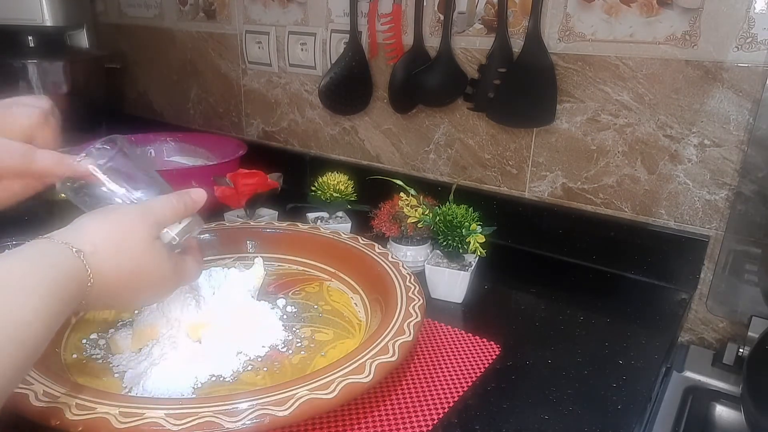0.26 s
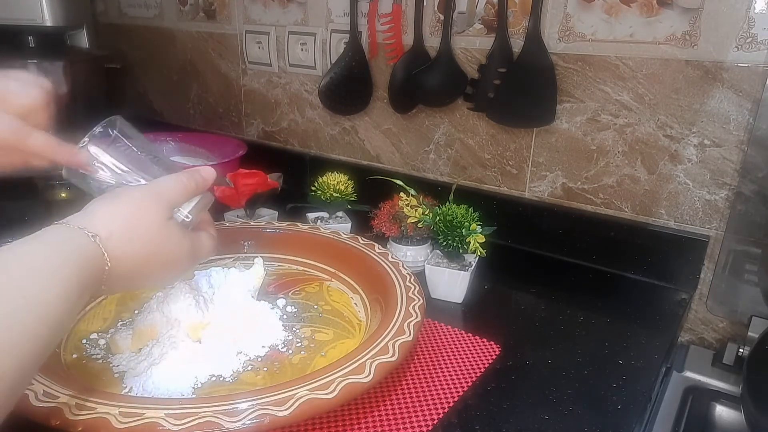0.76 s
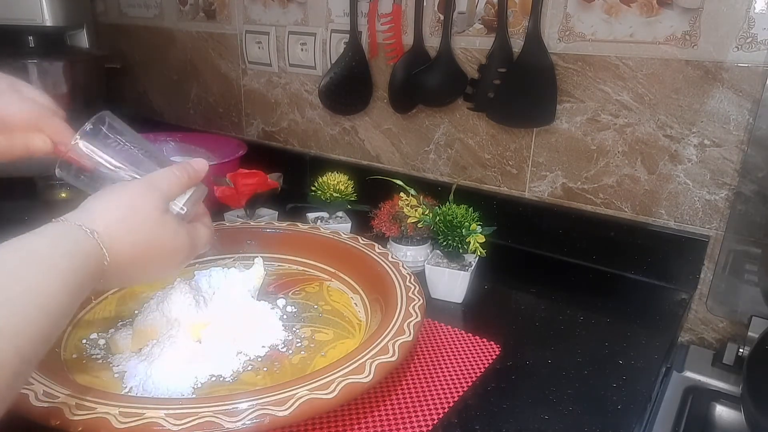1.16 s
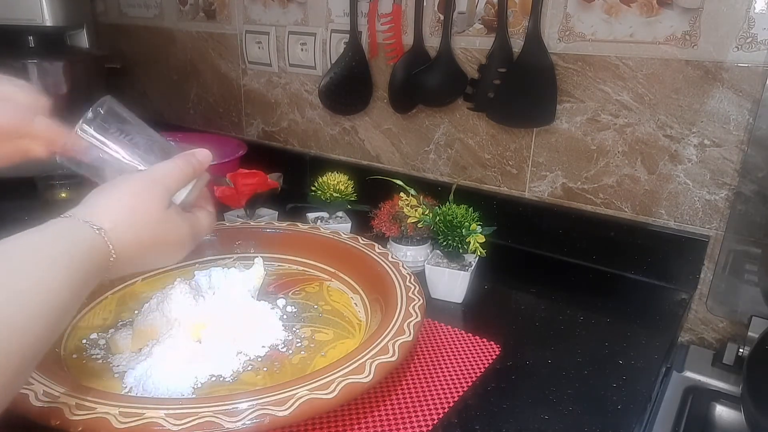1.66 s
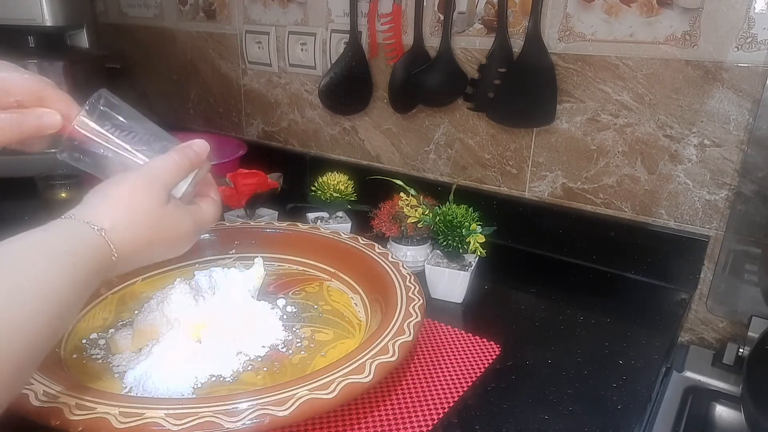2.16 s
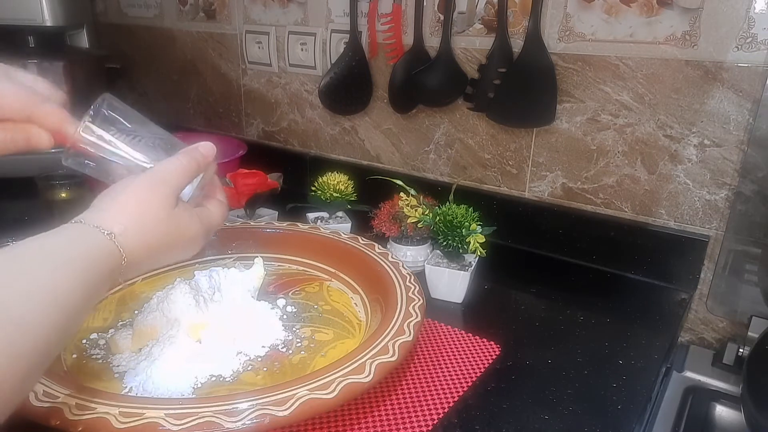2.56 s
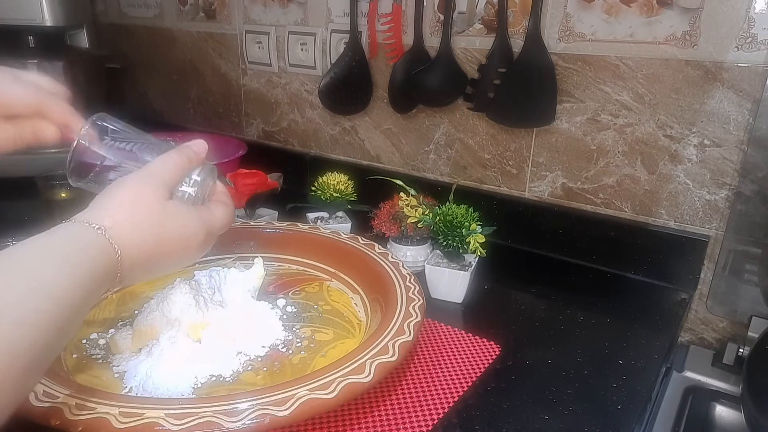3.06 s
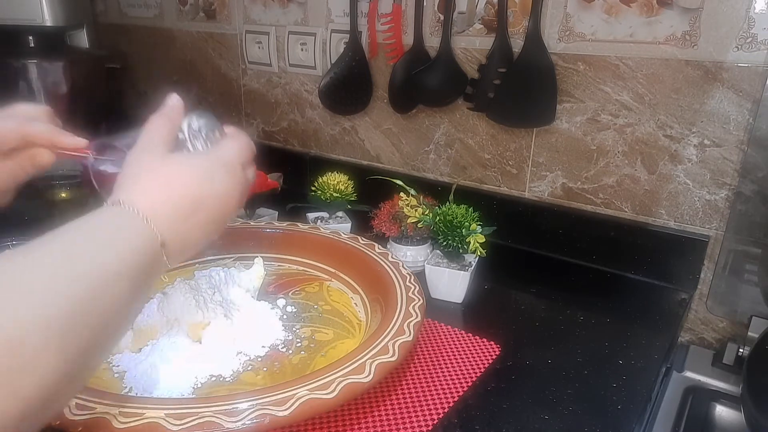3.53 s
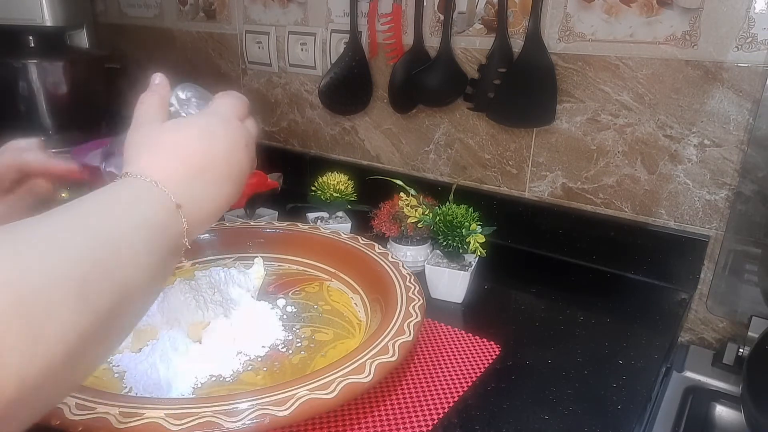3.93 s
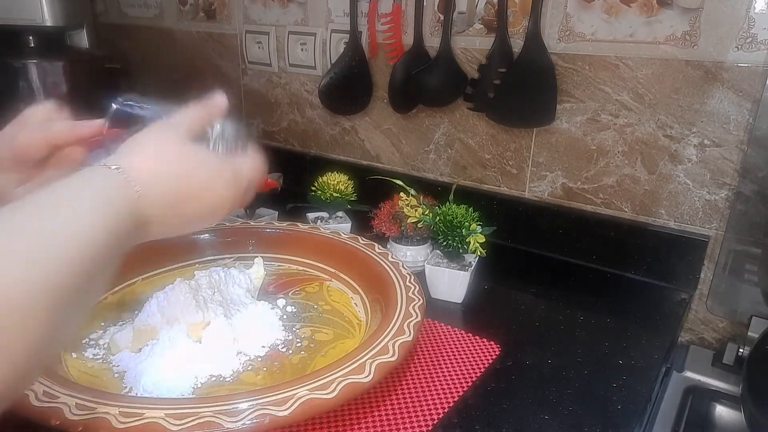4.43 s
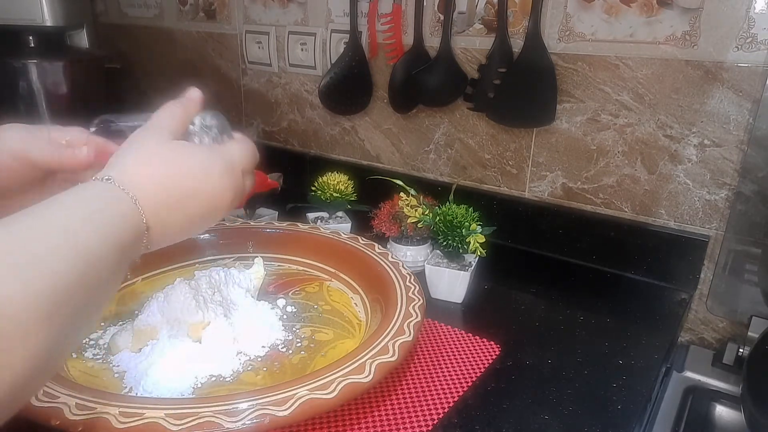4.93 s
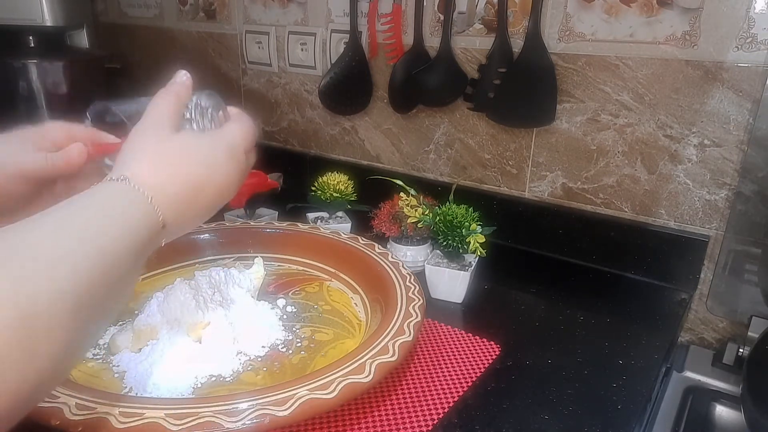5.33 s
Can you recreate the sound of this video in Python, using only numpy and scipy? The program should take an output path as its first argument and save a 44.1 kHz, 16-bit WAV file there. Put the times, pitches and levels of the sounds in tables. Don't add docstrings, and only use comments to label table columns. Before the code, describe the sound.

Someone scrapes out a glass with a spoon: sharp bright clinks, hollow taps on the bottom, two tiny squeaks, then soft scraping.

```python
import sys
import numpy as np
from scipy import signal
from scipy.fft import rfft, irfft, next_fast_len
from scipy.io import wavfile

SR = 44100
rng = np.random.default_rng(int(sys.argv[2]) if len(sys.argv) > 2 else 0)


def wrap_up_sound(samples):
    columns = np.atleast_2d(samples).T
    tamed = np.clip(columns, -1, 1)
    steps = np.round(tamed * 32767).astype(np.int16)
    wavfile.write(sys.argv[1], SR, steps)


def boost(x):
    u = np.asarray(x, float) / 20
    return 10 ** u


N = 246519

# (time [s], level [dB], air column pitch [Hz], thud level [dB])
BOTTOM_KNOCKS = [(0.001, -34, 875, -37.5), (0.029, -34.5, 940, -61.5), (0.246, -49, 910, -51),
                 (0.333, -49, 870, -75.5), (0.596, -19, 915, -50.5), (0.643, -33, 874, -35),
                 (0.936, -41, 855, -71), (1.055, -52, 960, -55), (1.306, -22, 888, -41),
                 (1.596, -22.5, 857, -32.5), (1.661, -37, 717, -37.5), (1.843, -21.5, 885, -37),
                 (2.07, -19.5, 878, -36), (2.157, -32.5, 872, -53), (2.196, -27.5, 885, -37),
                 (2.442, -16, 871, -34.5), (2.474, -39, 930, -41), (2.826, -34.5, 868, -54),
                 (2.91, -54, 840, -82), (3.165, -24.5, 882, -36), (3.228, -32, 935, -51),
                 (3.268, -33.5, 780, -34.5), (3.457, -43, 840, -53.5), (3.682, -31, 783, -47),
                 (3.74, -41, 985, -36), (4.034, -13.5, 873, -29), (4.522, -25.5, 890, -44),
                 (4.564, -46, 960, -54), (4.607, -37.5, 900, -85)]


def at_hz(points, hz):
    p = np.array(points)
    return np.interp(np.log(np.maximum(hz, 1)), np.log(p[:, 0]), p[:, 1])


def rms_one(x):
    return x / np.sqrt(np.mean(x ** 2) + 1e-20)


def noise(channels=None):
    return rng.standard_normal(N if channels is None else (channels, N))


def band_noise(low_hz, high_hz, order=2, channels=None):
    band = signal.butter(order, [low_hz, high_hz], "band", fs=SR, output="sos")
    return signal.sosfilt(band, noise(channels))


def coloured(spectrum, channels=1):
    size = next_fast_len(N)
    hz = np.arange(size // 2 + 1) * SR / size
    white = rfft(rng.standard_normal((channels, size)))
    return rms_one(irfft(white * boost(at_hz(spectrum, hz)), size)[:, :N])


def train(times, heights):
    clicks = np.full(N, 1e-18)
    at = np.round(np.asarray(times) * SR).astype(int)
    np.add.at(clicks, np.clip(at, 0, N - 1), heights)
    return clicks


def ring(clicks, hz, t60):
    r, w = boost(-60 / (t60 * SR)), 2 * np.pi * hz / SR
    return signal.lfilter([0, np.sin(w)], [1, -2 * r * np.cos(w), r * r], clicks)


def fade(clicks, t60):
    return signal.lfilter([1], [1, -boost(-60 / (t60 * SR))], clicks)


def dying(db, hz, t60, t, phase=0):
    return boost(db) * np.exp(-np.log(1000) * t / t60) * np.sin(2 * np.pi * hz * t + phase)


def flutter(hz, depth_db):
    slow = signal.sosfilt(signal.butter(2, hz, fs=SR, output="sos"), noise())
    return boost(depth_db * rms_one(slow))


def background():
    # (frequency [Hz], level [dB per Hz])
    air_colour = [(20, -29.5), (33, -19), (45, -12), (70, -11), (120, -15), (200, -17.5), (330, -16),
                  (600, -17), (1000, -28), (2200, -35.5), (8000, -38), (16000, -35)]
    # (frequency [Hz], level [dB rms])
    hum_lines = [(49, -92), (97, -81), (147, -80.5), (1668, -82)]
    # (time [s], level [dB])
    jolts = [
        (0.0, -53),
        (0.519, -67),
        (0.839, -50),
        (2.12, -59),
        (2.398, -55),
        (2.579, -58),
        (3.949, -71),
        (4.059, -60),
        (4.499, -66),
    ]
    t = np.arange(N) / SR
    mid, side = coloured(air_colour, channels=2)
    air = boost(-72.5) * (mid + 0.36 * side * np.c_[[1, -1]])
    hum = sum(boost(db + 2) * np.sin(2 * np.pi * hz * t) * flutter(6, 4.8) for hz, db in hum_lines)

    low = band_noise(260, 420, channels=2)
    low = low[0] + 0.5 * low[1] * np.c_[[1, -1]]
    knocked = np.array(BOTTOM_KNOCKS)
    swell = train(knocked[:, 0], boost(-51 + 0.46 * knocked[:, 1]))
    regrip_s, regrip_length_s, regrip_db = 4.47, 0.062, -56
    regrip = boost(regrip_db) * np.exp(-((t - regrip_s) / regrip_length_s) ** 2)
    hands = boost(-73.5) + fade(swell, 0.26) - fade(swell, 0.06) + regrip
    rumble = hands * rms_one(low) * flutter(13, 4.8)

    s, db = np.transpose(jolts)
    jolt = ring(train(s, boost(db)), hz=95, t60=0.081) + ring(train(s, boost(db - 6.5)), hz=60, t60=0.096)
    return air + rumble + (hum + jolt) * np.c_[[0.45, 1.1]]


def kitchen(x):
    # (frequency [Hz], time to fall 60 dB [s])
    room_t60 = [(300, 1), (1000, 0.33), (3000, 0.34), (8000, 0.34), (15000, 0.29)]
    t, tail = np.arange(int(0.7 * SR)) / SR, 0
    for low in 60 * 2.0 ** np.arange(8):
        high = min(2 * low, 15000) if low < 7000 else 18000
        band = signal.butter(2, [low, high], "band", fs=SR, output="sos")
        mid, side = signal.sosfilt(band, rng.standard_normal((2, len(t))))
        spread = np.clip(low / 500, 0.6, 1)
        both = mid + spread * side * np.c_[[1, -1]]
        tail = tail + both * boost(-60 * t / at_hz(room_t60, 2.06 * low))
    tail = tail * np.clip((t - 0.002) / 0.00067, 0, 1)
    tail = tail / np.sqrt(np.sum(tail ** 2) / 2)
    return signal.fftconvolve(x[None], tail, axes=1)[:, :N]


def motions():
    # (time [s], length [s], air column level [dB], its pitch [Hz], rustle level [dB])
    strokes = [
        (.29, 0.18, -54.5, 882, -56.5),
        (.97, 0.12, -66, 870, -52),
        (2.89, 0.17, -62, 888, -59.5),
        (4.386, 0.059, -51.5, 1070, -51.5),
        (5.042, 0.068, -82, 727, -58.5),
        (5.226, .16, -62, 860, -53),
    ]
    # (time [s], air column level [dB], its pitch [Hz])
    long_drag = [
        (4.6, -61, 870),
        (4.72, -59, 818),
        (4.83, -56.5, 880),
        (4.982, -53.5, 835.5),
        (5.07, -61.5, 767),
        (5.1, -56.5, 734),
        (5.21, -63, 740),
    ]
    u = np.array([0, 0.4, 1])
    swell = 13.5 * np.array([-0.5, 0, -1])
    rise_hz = 61.4 * (u - 0.5)
    short = [np.c_[s + length * u, db + swell, hz + rise_hz, rustle_db + swell]
             for s, length, db, hz, rustle_db in strokes]
    long = np.array(long_drag)
    return short + [np.c_[long, long[:, 1] - 10]]


def drag():
    # (frequency [Hz], level [dB per Hz])
    rustle_colour = [(500, -6.5), (1100, -15), (1800, -13), (2500, -7.5), (3450, -8), (4200, -7),
                     (5700, -10), (6400, -8.5), (9700, -7), (12300, -9.5), (16000, -37.5)]
    out = np.zeros(N)
    rustle = coloured(rustle_colour)[0] * flutter(40, 3.07)
    rub = noise()
    for hz, db, t60 in [(2540, -6, 0.2), (3475, -8.5, 0.06), (6630, -18, 0.18)]:
        rustle = rustle + boost(db) * rms_one(ring(rub, hz, t60))
    i, q = rms_one(signal.sosfilt(signal.butter(1, 9, fs=SR, output="sos"), noise(2)))
    lively, dull = flutter(25, 1.9), signal.butter(2, 1300, fs=SR, output="sos")
    for rows in motions():
        s, column_db, hz, rustle_db = np.transpose(rows)
        n = np.arange(round(s[0] * SR), round(s[-1] * SR))
        t = n / SR
        on = np.clip(np.minimum(t - s[0], s[-1] - t) / 0.016, 0, 1)
        phase = 2 * np.pi * np.cumsum(np.interp(t, s, hz)) / SR
        whistle = (i[n] + 0.37) * np.cos(phase) + q[n] * np.sin(phase)
        column = signal.sosfilt(dull, whistle) * lively[n]
        column_gain = boost(np.interp(t, s, column_db) - 1)
        rustle_gain = boost(np.interp(t, s, rustle_db) - 3.5)
        out[n] += on * (column_gain * column + rustle_gain * rustle[n])
    return out


def squeaks():
    starts = [1.362, 2.524]
    # (length [s], start pitch [Hz], end pitch [Hz], grit level [dB])
    glides = [
        (0.024, 892, 954, -50.5),
        (0.034, 1080, 1123, -36.5),
    ]
    # (level of overtones 1, 2, 3, 4, 5 [dB])
    overtones = [
        (-25.5, -48, -49, -52, -57),
        (-40.5, -34.5, -30, -40, -51),
    ]
    out, rough = np.zeros(N), flutter(100, 2.9)
    grit = rms_one(band_noise(1500, 7000))
    for s, (length, start_hz, end_hz, grit_db), orders_db in zip(starts, glides, overtones):
        u = np.linspace(0, 1, round(length * SR))
        phase = 2 * np.pi * np.cumsum(start_hz + (end_hz - start_hz) * u) / SR
        tone = sum(boost(db) * np.sin((k + 1) * phase) for k, db in enumerate(orders_db))
        swell = np.sqrt(np.abs(np.sin(np.pi * u)))
        i = round(s * SR)
        out[i:i + len(u)] += (tone + boost(grit_db) * grit[i:i + len(u)]) * swell
    return out * rough


def knocks():
    out, t = np.zeros(N), np.arange(SR // 16) / SR
    onset = 1 - np.exp(-t / 0.0017)
    for s, db, hz, _ in BOTTOM_KNOCKS:
        tone = dying(0, hz, 0.034, t)
        for base_hz, base_db in [(1012, -17.5), (732, -16), (595, -18.5), (3540, -25)]:
            tone += dying(base_db, base_hz, 0.047, t)
        i = round(s * SR)
        out[i:i + len(t)] += boost(db + 2.25) * (tone * onset)[:N - i]
    rows = np.array(BOTTOM_KNOCKS)
    thud = rms_one(band_noise(450, 2600)) * fade(train(rows[:, 0], boost(rows[:, 3] + 3.5)), 0.019)
    return out + thud


def clinks():
    # (time [s], crack level [dB], lowest wall
    # mode [dB], second wall mode [dB], spoon [dB])
    loose = [
        (0.4923, -31, -17, -33, -32.5),
        (3.985, -34, -20.5, -26.5, -42.5),
        (4.0507, -23, -18.5, -20.5, -17),
        (4.916, -84, -79, -56, -71),
    ]
    held = [
        (0.0014, -26, -17.5, -27, -52.5),
        (0.6421, -33, -34.5, -43.5, -39),
        (1.225, -31, -25, -33, -28),
        (1.5946, -28, -39, -42, -33.5),
        (2.376, -25, -19.5, -31.5, -24.5),
        (3.099, -40, -34, -60, -36.5),
        (3.4555, -35, -45, -42, -38),
        (3.682, -31.5, -43.5, -43.5, -55.5),
        (3.966, -33, -26.5, -35, -31.5),
        (4.522, -32, -38, -51, -58),
    ]
    tight = [(0.157, -34, -25.5, -30.5, -35), (0.545, -30, -21, -38.5, -26.5),
             (0.8314, -27, -16.5, -26.5, -21), (1.093, -61, -47, -53, -65), (1.295, -41, -40, -46, -43),
             (1.547, -44, -32.5, -42, -39), (1.557, -34, -29, -39, -33.5), (1.662, -42.5, -29, -40.5, -51),
             (1.8175, -38.5, -31.5, -72, -40.5), (2.02, -28.5, -21, -35.5, -25.5),
             (2.198, -43.5, -38, -64.5, -69), (2.441, -26, -28.5, -36.5, -46.5),
             (2.4784, -24, -34, -38.5, -24), (2.7359, -34, -26.5, -38.5, -38.5),
             (3.269, -29.5, -24, -41, -31), (4.4307, -32, -28, -45.5, -38.5)]
    # (free ringing [s], lowest wall mode [Hz], level of its twin [dB])
    grips = [
        (.022, 2562, -11),
        (0.018, 2590, -2),
        (.0075, 2575, -11.5),
    ]
    # (frequency [Hz], level [dB], time to fall 60 dB [s])
    upper = [
        [(6310, -3.5, 0.16), (6200, -20, 0.019), (6155, -8.5, 0.058)],
        [(11900, -11, 0.071), (12400, -14.5, 0.024)],
        [(8603, 1.5, 0.041), (8480, -3.5, 0.043), (8730, -5, 0.021), (7500, -17, 0.052)],
        [(3904, 10.5, 0.043), (3810, -11.5, 0.04), (3150, -8, 0.022)],
        [(10620, 4, 0.094), (10400, -0.5, 0.081)],
        [(11150, 2.5, 0.1), (11260, 3.5, 0.1)],
    ]
    # (frequency [Hz], level [dB per Hz])
    crack_colour = [(400, -26.5), (800, -12), (1500, -14), (2200, -7), (3500, -6), (5000, -9),
                    (7000, -11.5), (8600, -5.5), (9600, -13.5), (11000, -12), (14000, -37), (16500, -52)]
    wall = np.array([(*row, *grip) for rows, grip in zip([loose, held, tight], grips) for row in rows])
    times, crack_db, first_db, second_db, spoon_db = wall.T[:5]

    turn_s, turn_loss_db = 2.65, 13.5
    tick_db = (crack_db + spoon_db) / 2 + 31 - 35.5 - turn_loss_db * (times > turn_s)
    spoon_4k_db = crack_db - 17.5
    spoon_10k_db = (second_db + spoon_db) / 2 - 10.5
    third_db = (first_db + second_db) / 2 + 0.46 * (second_db - spoon_db) - 23
    families = np.c_[second_db, tick_db, spoon_db, spoon_4k_db, spoon_10k_db, third_db]

    out, t = np.zeros(N), np.arange(SR // 6) / SR
    rise, slow_rise = 1 - np.exp(-t / 0.00009), 1 - np.exp(-t / 0.0015)
    twin_hz = -38.5
    chance = rng.standard_normal((len(wall), 60))
    for (s, _, ping_db, _, _, free, ping_hz, twin_db), levels, luck in zip(wall, families, chance):
        ping_hz *= 1 + 0.004 * luck[19]
        ping = dying(ping_db, ping_hz, 0.22, t)
        twin = dying(ping_db + twin_db, ping_hz + twin_hz, 0.067, t)
        sound = (ping + twin) * slow_rise
        modes = [(family_db, *mode) for family_db, family in zip(levels, upper) for mode in family]
        for k, (family_db, hz, mode_db, t60) in enumerate(modes):
            level_db = family_db + mode_db + 3.5 + 2 * luck[k]
            pitch_hz = hz * (1 + 0.0013 * luck[k + 20])
            sound += dying(level_db, pitch_hz, t60, t, 3 * luck[-1 - k]) * rise
        damped = boost(-60 * np.maximum(t - free, 0) / 0.018) + 0.13
        i = round(s * SR)
        out[i:i + len(t)] += (sound * damped)[:N - i]

    hits = train(times, boost(crack_db + 2))
    crack_shape = fade(hits, 0.027) - fade(hits, 0.0051) + boost(-5.5) * fade(hits, 0.035)
    crack = coloured(crack_colour)[0] * crack_shape
    tick = rms_one(band_noise(10500, 15000, order=4)) * fade(train(times, boost(tick_db - 7)), 0.14)
    return out + crack + tick


def left_way(x):
    # (frequency [Hz], level [dB], phase lead [radians])
    left_path = [(510.6, 2.5, .5), (950, -2.5, 0.42), (1600, 1, 0.47), (2700, 1, -.9), (4240, -2, 0.24),
                 (6300, -1, -0.14), (12000, -2.5, 0.31)]
    size, path = next_fast_len(N), np.array(left_path)
    hz = np.arange(size // 2 + 1) * SR / size
    gain, lead = boost(at_hz(path[:, :2], hz)), at_hz(path[:, ::2], hz)
    return irfft(rfft(x, size) * gain * np.exp(1j * lead), size)[:N]


def scene():
    glass = clinks() + knocks() + squeaks() + drag()
    no_bass = signal.butter(4, 480, "high", fs=SR, output="sos")
    glass = signal.sosfilt(no_bass, glass)
    left_lead, left_db = 6, -3.5
    direct = np.array([left_way(glass), np.r_[np.zeros(left_lead), glass[:-left_lead]]])
    mix = direct + boost(-3) * kitchen(glass) + background()
    return mix * boost(np.c_[[left_db / 2, -left_db / 2]])


def band_limit(x):
    return signal.sosfilt(signal.butter(12, 16970, fs=SR, output="sos"), x)


def record(dry):
    dip = signal.butter(2, [9050, 10300], "bandstop", fs=SR, output="sos")
    top = signal.butter(6, 15300, fs=SR, output="sos")
    return band_limit(signal.sosfilt(np.r_[dip, top], dry))


dry = scene()
out = record(dry)
wrap_up_sound(out)
```